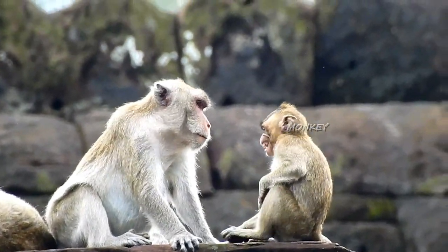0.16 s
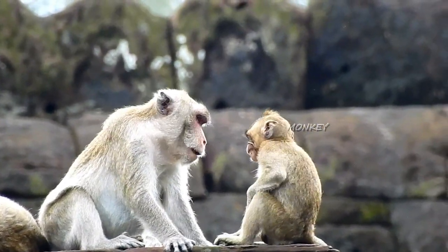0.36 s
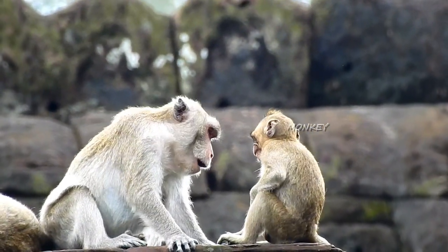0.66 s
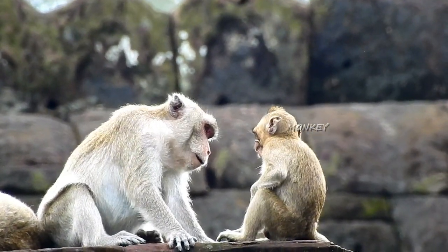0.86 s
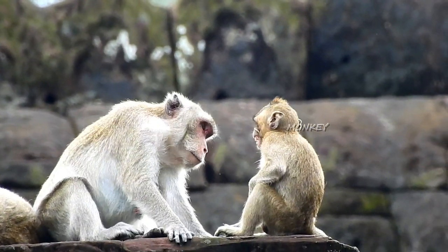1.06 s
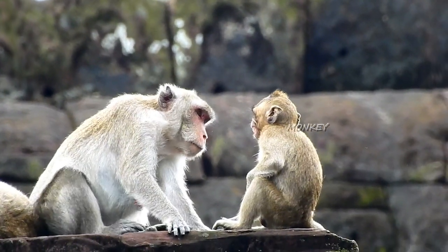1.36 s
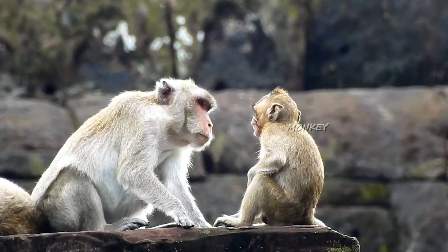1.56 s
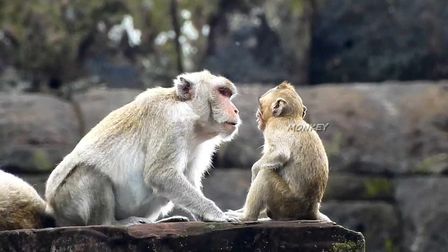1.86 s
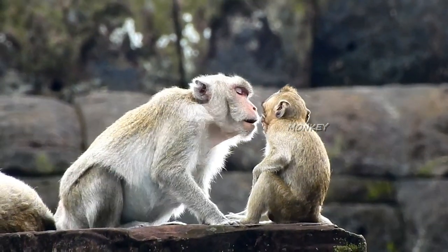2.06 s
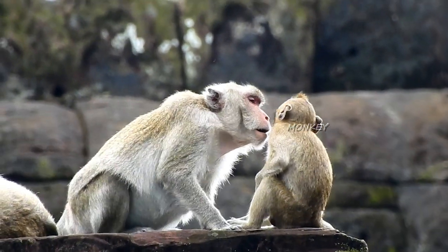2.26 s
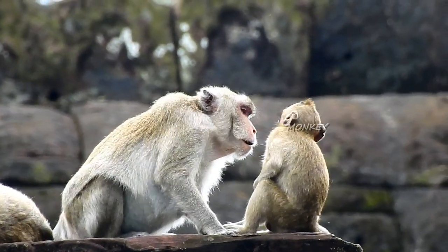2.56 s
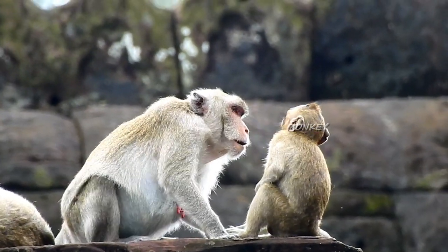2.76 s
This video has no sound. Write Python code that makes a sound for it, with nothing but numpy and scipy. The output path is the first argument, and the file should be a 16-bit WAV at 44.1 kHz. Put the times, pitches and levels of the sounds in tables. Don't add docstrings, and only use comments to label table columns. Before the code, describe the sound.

A young monkey squeals and chirps shrilly at close range, in fast bursts from 0.06 to 0.5 s, then weaker glides and hoarse rasps with knocks until 1.4 s. A long wavering cry runs 1.4-1.9 s, a second 2.1-2.6 s growing hoarse. A sharp click at 2.6 s precedes faint bird notes. Soft rustles, insect hum, distant traffic swelling near 1 s, short stone echo.

```python
import sys
import numpy as np
from scipy import signal
from scipy.fft import rfft, irfft, next_fast_len
from scipy.io import wavfile

SR = 44100
rng = np.random.default_rng(int(sys.argv[2]) if len(sys.argv) > 2 else 0)


def makeup_ratio(level_db):
    decades = np.asarray(level_db, float) / 20
    return 10 ** decades


def master_out(mix):
    frames = np.transpose(np.atleast_2d(mix))
    ceiling = np.clip(frames, -1, 1)
    pcm = np.round(ceiling * 32767).astype(np.int16)
    wavfile.write(sys.argv[1], SR, pcm)


N = 127890
TIME = np.arange(N) / SR
OPPOSITE = np.array([[1], [-1]])


def rms_one(x):
    return x / np.sqrt(np.mean(np.abs(x) ** 2) + 1e-20)


def in_time(rows):
    moments, *columns = np.transpose(rows)
    return [np.interp(TIME, moments, column) for column in columns]


def at_hz(points, hz):
    p = np.array(points)
    return np.interp(np.log(np.maximum(hz, 1)), np.log(np.maximum(p[:, 0], 1)), p[:, 1])


def drift(rate_hz, size=N):
    r = np.exp(-2 * np.pi * rate_hz / SR)
    settle = 20000
    smooth = signal.lfilter([1], [1, -2 * r, r * r], rng.standard_normal(size + settle))
    return rms_one(smooth[settle:])


def gate(start, length, swell=0):
    attack_s, release_s = 0.0023, 0.00438
    t = TIME - start
    opening = np.clip(t / (attack_s + swell * length ** 2), 0, 1)
    return opening * np.exp(-np.maximum(t - length + release_s, 0) / release_s)


def resonate(x, hz, width_hz):
    r = np.exp(-np.pi * width_hz / SR)
    feedback = [1, -2 * r * np.cos(2 * np.pi * hz / SR), r * r]
    return signal.lfilter([(1 - r * r) / 2, 0, (r * r - 1) / 2], feedback, x + 1e-18)


def shaky(rough, width_hz):
    rough = np.clip(rough, 0, 1)
    smooth = signal.butter(5, width_hz, fs=SR, output="sos")
    a, b = signal.sosfilt(smooth, rng.standard_normal((2, N)))
    return 1 - rough + rough * rms_one(a + 1j * b)


def banded_noise(spectrum, patchy_db):
    # f/Hz, likeness (0-1)
    likeness = [(30, .87), (150, .97), (280, 0.45), (700, .75), (4000, 0.6), (12000, 0.25)]
    lowest, highest = spectrum[0][0], spectrum[-1][0]
    borders = np.geomspace(lowest, highest, int(3 * np.log2(highest / lowest)))
    white = rng.standard_normal((2, 2, N))
    out = 0
    for k, (low, high) in enumerate(zip(borders, borders[1:])):
        band = signal.butter(2, [low, high], "band", fs=SR, output="sos")
        mid, side = signal.sosfilt(band, white[k % 2])
        hz = np.sqrt(low * high)
        alike = np.clip(at_hz(likeness, hz), -1, 1)
        stereo = np.sqrt(1 + alike) * mid + np.sqrt(1 - alike) * side * OPPOSITE
        out = out + makeup_ratio(at_hz(spectrum, hz) + patchy_db * drift(7.36)) * stereo
    return rms_one(out)


def rumble():
    # f/Hz, density/dB per Hz
    deep_colour = [(22, -8), (92, -5.5), (150, 6), (220, -5.5), (340, -16.5)]
    passing_db = 7.6 * np.exp(-((TIME - 1.05) / 0.697) ** 2)
    return makeup_ratio(-78.5 + passing_db) * banded_noise(deep_colour, patchy_db=2.0)


def open_air():
    # t/s, level/dB
    bustle_points = [(0, -55.5), (.1, -79.5), (.42, -85), (.8, -62), (1.1, -90.5), (1.3, -74.5), (1.8, -80),
                     (2.3, -67.5), (2.6, -85)]
    # f/Hz, density/dB per Hz
    air_colour = [(220, -16), (700, -11.5), (1700, -8.5), (3100, -3.5), (4400, -13.5), (7000, -33.5),
                  (15500, -41)]
    bustle, = in_time(bustle_points)
    level_db = -65.5 + 0.393 * (bustle - bustle.mean())
    return makeup_ratio(level_db) * banded_noise(air_colour, patchy_db=5.5)


def insects():
    hz, width_hz = 3022.6, 536
    mid, side = [resonate(resonate(n, hz, width_hz), hz, width_hz) for n in rng.standard_normal((2, N))]
    return makeup_ratio(-68 + 3.7 * drift(3.61)) * rms_one(mid + 0.473 * side * OPPOSITE)


def rustles():
    # t/s, width/s, level/dB, f/Hz
    puffs = [(.02, 0.057, -62, 1916), (0.249, 0.022, -75, 291), (0.421, 0.044, -72, 457),
             (0.548, 0.0657, -68, 1141), (0.822, 0.0504, -58.5, 1352), (0.829, 0.033, -71, 588),
             (1.13, 0.082, -70, 1943), (1.282, 0.0336, -67, 672), (1.359, 0.0664, -71, 492.5),
             (1.6, 0.125, -63.5, 2087), (1.99, 0.0536, -71, 904), (2.202, 0.133, -71.5, 1225),
             (2.321, 0.0604, -66.5, 699), (2.45, 0.092, -72, 1261), (2.82, 0.0533, -71.5, 1110),
             (2.84, 0.045, -70, 2235)]
    sharpness = 2.4
    out = np.zeros(N)
    for s, width_s, db, hz in puffs:
        noise = resonate(rng.standard_normal(N), hz, hz / sharpness)
        noise = resonate(noise, hz, hz / sharpness)
        out += makeup_ratio(db) * np.exp(-((TIME - s) / width_s) ** 2) * rms_one(noise)
    return out


def gliding_tones(rows, rough, width_hz, flutter, swell):
    octave_db, fifth_db, bend = -25, -21, .7
    out = np.zeros(N)
    beat = np.cumsum(110 * (1 + 0.2684 * drift(69.2))) / SR
    shake = shaky(rough, width_hz) * (1 + np.clip(flutter, 0, 1) * np.cos(2 * np.pi * beat))
    blur = shaky(1, 2 * width_hz)
    for s, length, db, from_hz, to_hz in rows:
        span = slice(int(s * SR), int((s + length + .03) * SR))
        progress = np.clip((TIME[span] - s) / length, 0, 1.1) ** bend
        turn = 2 * np.pi * np.cumsum(from_hz + (to_hz - from_hz) * progress) / SR
        overtones = makeup_ratio(octave_db) * np.exp(2j * turn) + makeup_ratio(fifth_db) * np.exp(1.45j * turn)
        wave = np.exp(1j * turn) + blur[span] * overtones
        out[span] += makeup_ratio(db + 4.5) * gate(s, length, swell)[span] * (shake[span] * wave).imag
    return out


def birds():
    # t/s, length/s, level/dB, from f/Hz, to f/Hz
    bird_notes = [
        (2.645, .055, -63, 2720, 3150),
        (2.695, .07, -64, 3130, 3080),
        (2.76, .09, -67, 3150, 2950),
        (.865, .04, -62, 2980, 2960),
    ]
    return gliding_tones(bird_notes, rough=0.934, width_hz=57, flutter=0, swell=2.7)


def clicks():
    # t/s, peak/dB, f/Hz, time to fall 60 dB/s
    hits = [(.154, -29, 6200, .003), (.496, -46, 900, .02), (.768, -36, 1750, .025),
            (.7745, -37, 1800, .025), (.811, -38, 1720, .02), (.839, -46, 820, .035),
            (.863, -38, 1900, .015), (1.264, -39, 3800, .004), (1.276, -46, 4500, .004),
            (.071, -44, 5200, .005), (1.69, -40, 5600, .008), (1.504, -47, 2000, .02),
            (1.56, -35, 1880, .025), (2.6262, -22, 5100, .012), (2.668, -42, 5100, .012),
            (2.676, -45, 5100, .012), (2.684, -45, 5400, .012), (2.698, -34, 3600, .007)]
    size = 4000
    out, t = np.zeros(N + size), np.arange(size) / SR
    for s, db, hz, t60 in hits:
        ring = np.sin(2 * np.pi * hz * t) * makeup_ratio(-60 * t / t60) * np.minimum(t / t60 * 30, 1)
        crack = makeup_ratio(-32) * rng.standard_normal(size) * np.exp(-t / 0.00063)
        first = int(s * SR)
        out[first:first + size] += makeup_ratio(db) * (ring + crack)
    return out[:N]


def glides():
    # t/s, length/s, level/dB, from f/Hz, to f/Hz
    calls = [(.222, 0.0315, -44, 4400, 3893), (.2565, 0.0087, -28.5, 6370, 5067),
             (.268, 0.0082, -51.5, 6200, 4100), (.381, 0.00484, -34.5, 5470, 5050),
             (.3968, 0.00672, -26.5, 5900, 4730), (.607, 0.0153, -53, 3280, 4670),
             (2.2, 0.089, -46, 5954, 5642), (2.47, 0.078, -47, 5280, 4950),
             (.623, 0.017, -41.5, 4100, 3816), (.812, 0.0413, -46.5, 4250, 3950),
             (.868, 0.0262, -44.5, 6350, 5650), (.892, 0.0277, -50, 5750, 6135),
             (.962, 0.0302, -50, 3200, 4842), (1.162, 0.0268, -42.5, 4320, 3744)]
    return gliding_tones(calls, rough=0.387, width_hz=409, flutter=0.22, swell=0)


def squeals():
    # t/s, length/s, level/dB, from f/Hz, to f/Hz
    calls = [(.058, 0.0258, -50.5, 5540, 4914), (.66, 0.0195, -46, 4218, 4014),
             (.684, .018, -48, 4223, 3946), (.718, 0.0244, -47, 5143, 4968),
             (.231, 0.0196, -32, 5200, 5062), (.241, 0.0285, -44.5, 5670, 7140),
             (.406, 0.0344, -29.5, 5530, 5021), (.443, 0.0259, -45, 4530, 3744),
             (.623, 0.0331, -43.5, 5005, 4898), (.783, 0.036, -47.5, 5900, 4862),
             (1.118, 0.0622, -43, 5494, 4740), (1.318, 0.0541, -34.5, 4720, 5965),
             (1.345, 0.0605, -33.5, 5889, 6040), (1.40, 0.044, -43.5, 5900, 5640)]
    return gliding_tones(calls, rough=0.487, width_hz=483.5, flutter=0.222, swell=3.98)


def rasps():
    # t/s, length/s, level at start/dB, level at end/dB
    calls = [(0.286, 0.0427, -43.5, -49.5), (0.329, 0.114, -53, -42.5), (0.408, 0.2095, -48.5, -61.5),
             (0.62, 0.1104, -46.5, -46.5), (0.737, 0.1453, -48.5, -50.5), (0.964, 0.363, -57, -68),
             (1.115, 0.0637, -54.5, -46), (1.32, 0.096, -46.5, -38), (1.429, 0.1571, -58, -45.5),
             (1.687, 0.0166, -48.5, -46.5), (1.722, 0.0628, -58.5, -44.5), (1.799, 0.113, -51, -57.5)]
    # f/Hz, width/Hz, level/dB
    tract = [(4100, 1660, -7), (5200, 2230, 3), (5900, 1650, 2), (7382, 2230, -5), (10510, 1800, -22.5),
             (12600, 2600, -27), (15100, 1200, -30.5)]
    slap = rng.random(N) < 2300 / SR
    strength = makeup_ratio(5.3 * np.minimum(rng.exponential(1, N), 3))
    slaps = slap * strength * rng.choice([-1, 1], N)
    source = rms_one(slaps) + 1.27 * rng.standard_normal(N)
    voice = np.zeros(N)
    for k, (hz, width_hz, db) in enumerate(tract):
        ringing = resonate(resonate(source, hz, width_hz), hz, 0.66 * width_hz)
        voice += makeup_ratio(db) * rms_one(ringing) * (-1) ** k
    level = sum(gate(s, n) * makeup_ratio(np.interp(TIME, [s, s + n], [a, b])) for s, n, a, b in calls)
    return level * rms_one(voice)


def cry(pitch, db, rough, throat, share, width_hz, wobble, count):
    turn = 2 * np.pi * np.cumsum(pitch * (1 + wobble * drift(65.4))) / SR
    out = np.zeros(N)
    for k in range(2, 12):
        hz = k * pitch
        level = makeup_ratio(db + at_hz(throat, hz)) * share(k) * (hz < 15600)
        shake = shaky(rough * max(k, count) / (count + 1), width_hz)
        out += level * (shake * np.exp(1j * k * turn)).imag
    return out


def first_cry():
    # t/s, strong line f/Hz, level/dB, share of odd overtones (0-1)
    path = [
        (1.413, 4350, -42.5, 0.56),
        (1.468, 4368, -45.5, 0.7),
        (1.523, 4808, -41, 0.163),
        (1.609, 4707, -40, 0.22),
        (1.627, 4433, -49.5, 0.786),
        (1.69, 4259, -41.5, 0.394),
        (1.741, 4020, -39.5, 0.742),
        (1.793, 4405, -42, 0.338),
        (1.931, 4369, -40, 0.069),
    ]
    # f/Hz, level/dB
    throat = [(2200, -67), (4400, -1), (6600, 4), (8800, -17.5), (11000, -16), (13200, -35.5), (15400, -48)]
    # t/s, width/s, level/dB
    end_swell = (1.917, 0.00566, 8.75)
    line, db, odd = in_time(path)
    db = db + end_swell[2] * np.exp(-((TIME - end_swell[0]) / end_swell[1]) ** 2)

    def share(k):
        return odd if k % 2 else 1

    voice = cry(line / 2, db, .3, throat, share, 270, 0.01514, count=2)
    return voice * gate(path[0][0], path[-1][0] - path[0][0])


def second_cry():
    # t/s, pitch f/Hz, level/dB, roughness (0-1), hoarse band level/dB
    path = [
        (2.085, 1235, -36.5, 0.36, -81.5),
        (2.098, 1479, -35.5, 0.49, -42),
        (2.136, 1432, -38, 0.56, -42.5),
        (2.203, 1487, -40, 0.35, -44),
        (2.293, 1411, -41.5, 0.53, -42.5),
        (2.362, 1459, -43.5, 1.12, -40),
        (2.529, 1365, -44.5, 0.79, -38.5),
        (2.635, 1381, -48, 0.59, -40),
        (2.642, 1400, -76, 0.78, -56),
    ]
    # f/Hz, level/dB
    throat = [(2900, -22), (4400, 1), (5900, 1), (7300, -4), (8800, -24), (10300, -24), (11800, -32.5),
              (14800, -42)]
    pitch, db, rough, hoarse_db = in_time(path)

    def share(k):
        if k < 5:
            return 1.3 - rough
        return .2 if k % 3 == 0 else 1

    voice = cry(pitch, db, rough, throat, share, 277, 0.00593, count=4)
    carrier = np.exp(2j * np.pi * 3.7 * np.cumsum(pitch) / SR)
    hoarse = makeup_ratio(hoarse_db) * (shaky(0.978, 457) * carrier).imag
    return (voice + hoarse) * gate(path[0][0], path[-1][0] - path[0][0])


def monkey():
    return squeals() + glides() + rasps() + first_cry() + second_cry()


def ports(x):
    # f/Hz, phase/rad
    lead = [(3200, -1), (4100, -1), (5300, -2), (7700, -3), (14000, -2)]
    # f/Hz, level/dB
    louder_left = [(1000, 4.5), (2500, -3.5), (5000, 3.5), (9000, 1)]
    size = next_fast_len(N + 2000)
    hz = np.arange(size // 2 + 1) * SR / size
    half = makeup_ratio(at_hz(louder_left, hz) / 2) * np.exp(.5j * at_hz(lead, hz))
    return irfft(rfft(x, size) * np.array([half, 1 / half]), size)[:, :N]


def walls(x):
    t60_s, start_s = 0.322, 0.01307
    t = np.arange(SR) / SR
    shape = makeup_ratio(-60 * t / t60_s) * np.clip(t / start_s - .5, 0, 1)
    tail = signal.lfilter([1], [1, -.5], rng.standard_normal((2, SR))) * shape
    tail = tail / np.sqrt(np.sum(tail[0] ** 2))
    return makeup_ratio(-15) * signal.fftconvolve(x[None], tail, axes=1)[:, :N]


def scene():
    # t/s, extra left level/dB
    head = [
        (0, -0.5),
        (.45, 3),
        (.7, 0.72),
        (.9, 0),
        (1.2, 1.54),
        (2.1, -0.7),
        (2.6, 2.03),
        (2.9, 13.5),
    ]
    background = rumble() + open_air() + insects() + rustles() + birds()
    small = clicks()
    near = monkey()
    head_db, = in_time(head)
    direct = ports(near) * makeup_ratio(head_db * OPPOSITE / 2)
    knocks = ports(small) * makeup_ratio(-4 * OPPOSITE / 2)
    return background + knocks + direct + walls(near + .5 * small)


def top_cut(x):
    return signal.sosfilt(signal.butter(12, 15690, fs=SR, output="sos"), x)


def record(dry):
    return top_cut(dry)


dry = scene()
out = record(dry)
master_out(out)
```